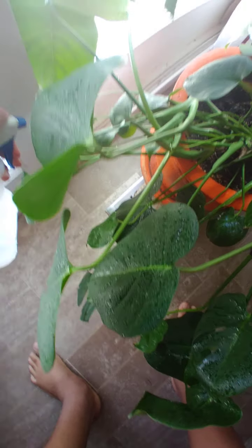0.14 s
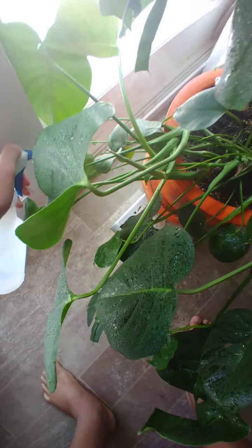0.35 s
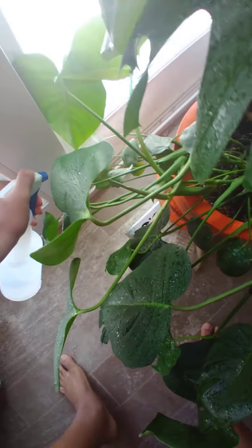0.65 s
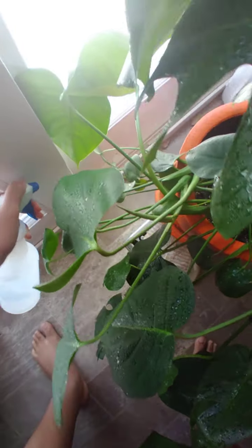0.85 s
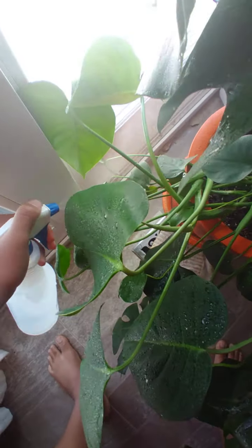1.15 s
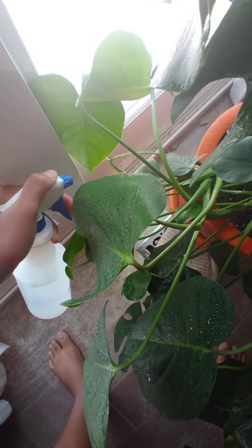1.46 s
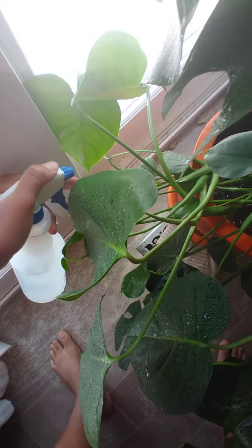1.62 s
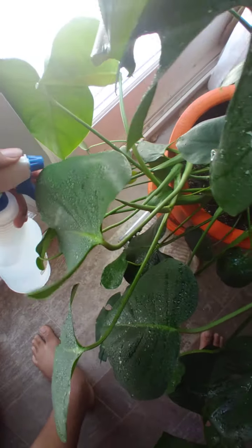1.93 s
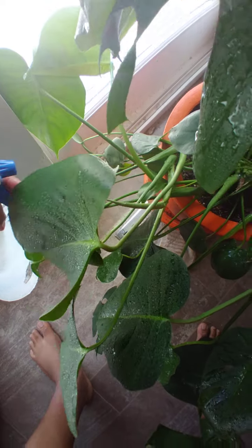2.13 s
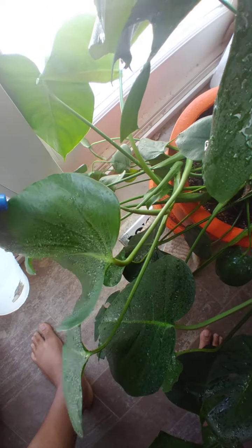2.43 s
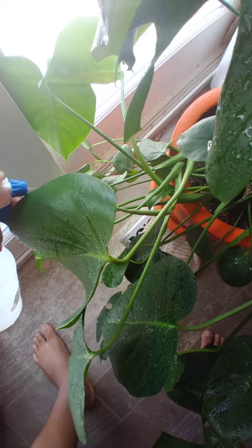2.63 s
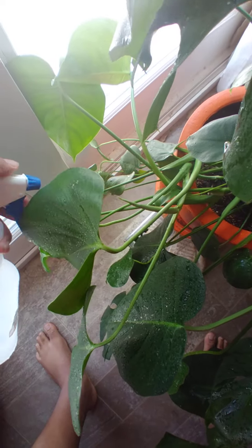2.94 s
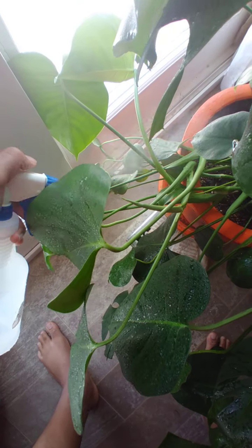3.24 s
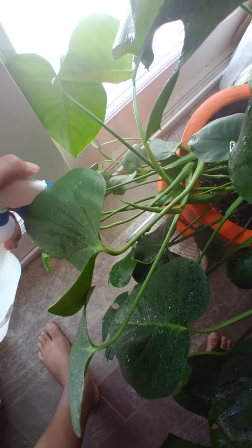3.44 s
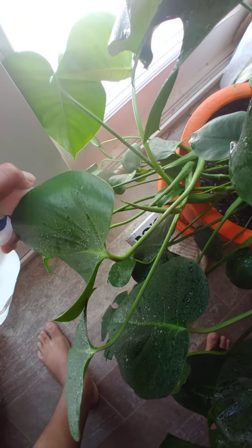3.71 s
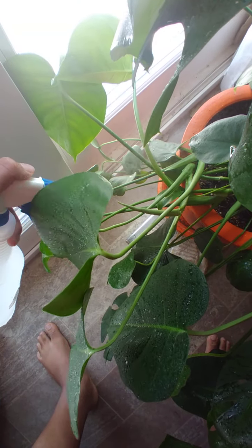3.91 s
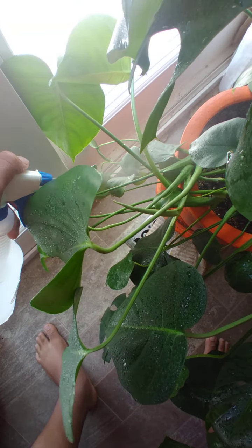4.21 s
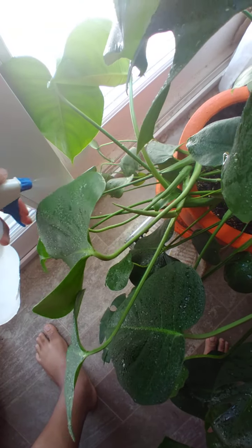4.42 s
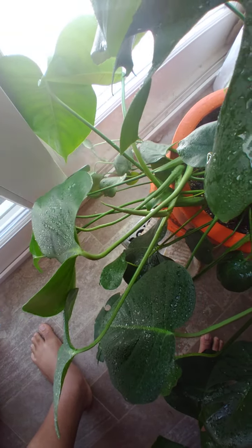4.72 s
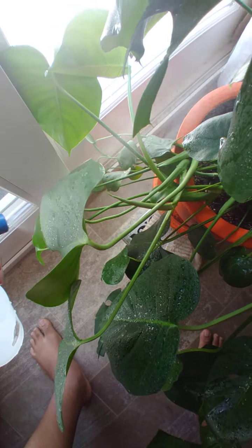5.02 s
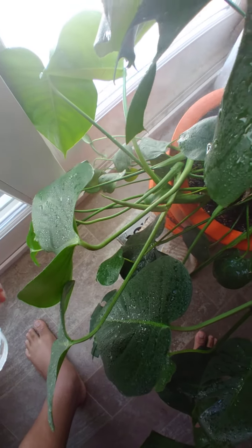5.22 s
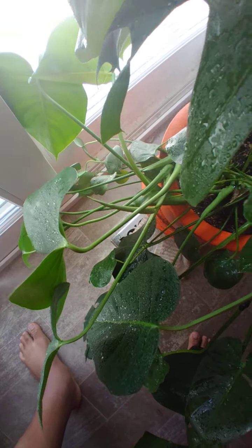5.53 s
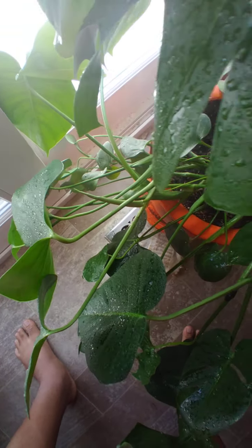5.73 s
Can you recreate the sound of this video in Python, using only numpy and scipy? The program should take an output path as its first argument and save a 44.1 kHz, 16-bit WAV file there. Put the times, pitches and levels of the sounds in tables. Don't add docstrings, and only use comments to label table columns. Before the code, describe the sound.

A hand trigger bottle squirts nine short hissing bursts of mist onto houseplant leaves, with small plastic clicks between, close up in a quiet room.

```python
import sys
import numpy as np
from scipy import signal
from scipy.fft import rfft, irfft, next_fast_len
from scipy.io import wavfile
from scipy.ndimage import uniform_filter1d, map_coordinates

SR = 44100
rng = np.random.default_rng(int(sys.argv[2]) if len(sys.argv) > 2 else 0)


def how_loud(loudness_db):
    steps = np.asarray(loudness_db, float) / 20
    return 10 ** steps


def digitize_waveform(pressure):
    field = np.atleast_2d(pressure).T
    bounded = np.clip(field, -1, 1)
    quanta = np.round(bounded * 32767).astype(np.int16)
    wavfile.write(sys.argv[1], SR, quanta)


N = 258426
STEP = 16

# frequency in Hz, level in dB per Hz.
AIR_SPECTRUM = [(15, -44), (30, -14), (60, -4), (130, -11.5), (240, -9), (450, -26.5), (800, -23.5),
                (1700, -29.5), (3000, -35), (5000, -31), (9100, -25.5), (12000, -35.5), (16000, -41)]
# frequency in Hz, level in dB rms.
MAINS_PARTIALS = [(59.2, -79), (236.9, -90), (296.1, -84), (495.3, -106.5)]
# start in seconds, length in seconds, level in dB, fading in dB.
SHUFFLES = [
    (1.3, 0.23, -77.5, 8.5),
    (1.93, 0.33, -78, 14),
    (4.57, 0.36, -74.5, -1),
    (5.26, .04, -72.5, 5),
]
# frequency in Hz, level in dB per Hz.
SCUFF_SPECTRUM = [(120, -44.5), (220, 3), (400, -2.5), (700, -12), (1500, -31)]

# valve opening, full pressure and finger easing, all in seconds,
# jet level in dB, shutting rate in dB per second.
PULLS = [
    (0.034, 0.114, 0.24, -26.5, 306.5),
    (0.478, 0.561, 0.66, -27, 359),
    (0.937, 1.037, 1.1305, -28, 351.5),
    (3.07, 3.151, 3.293, -27.5, 320),
    (3.532, 3.638, 3.777, -27.5, 383),
    (3.984, 4.09, 4.19, -27.5, 340),
    (4.416, 4.497, 4.617, -27.5, 303),
    (4.866, 4.947, 5.081, -26, 478),
    (5.291, 5.359, 5.488, -28, 240),
]
# time in seconds, left-right difference in dB, squareness to a leaf in dB.
NOZZLE_AIM = [(.13, -6.5, -0.5), (.57, -4.5, -0.8), (1.05, -3.5, 0.3), (3.18, -6.5, 1.4), (3.65, -5, 2.15),
              (4.1, -6, 2.2), (4.5, -5, -1.5), (4.97, -6.5, 0.1), (5.4, -2, 2.5)]
# frequency in Hz, level in dB per Hz.
JET_SPECTRUM = [(1760, -52.5), (3000, -32), (3600, -18), (4230, -17), (5290, -11), (5880, -9), (7350, -7),
                (9010, 1), (9460, 5.5), (11400, -6.5), (15100, -12), (16000, -20.5)]
# frequency in Hz, level in dB per Hz.
LEAF_SPECTRUM = [(240, -75.5), (400, -33), (1090, -15), (1160, -13.5), (1930, -3), (2710, -2.5),
                 (3450, 0.5), (5000, -3), (6500, -16), (11000, -120)]

# start in seconds, length in seconds, level in dB, fading in dB,
# dull share in dB.
PUMP_REFILLS = [
    (.3, 0.12, -60, 36, -9),
    (.765, 0.087, -53.5, 6.5, -2),
    (1.2, 0.1, -61.5, 3, -14),
    (3.35, 0.095, -66.5, 2.5, -1.5),
    (3.82, .13, -58.5, 23.5, 2),
    (4.28, 0.081, -74, 12, -5),
    (4.752, 0.077, -53, 16.5, -17),
    (5.163, 0.068, -52, 35, -14.5),
    (5.6, .2, -66, 24, -13),
]
# start in seconds, length in seconds, level in dB, fading in dB,
# dull share in dB.
LEAF_BRUSHES = [(0.433, .03, -70, -18, -22), (.74, 0.023, -41.5, 13, -3), (1.33, 0.395, -83.5, 1, -4),
                (1.855, 0.072, -73, 9, -13.5), (1.92, .07, -55.5, 3.5, -18.5), (2.03, 0.12, -66, 20, -12),
                (2.145, .05, -73.5, -3.5, -4.5), (2.253, 0.094, -75, 0.5, -3),
                (2.485, 0.082, -70.5, 18, -3), (2.61, 0.085, -74, -1.5, -15.5),
                (2.811, 0.049, -53.5, -4.5, -19), (2.861, 0.062, -52.5, 19, -16.5),
                (2.943, 0.031, -65, 12, -10), (2.999, 0.0099, -53.5, 52, -3.5), (3.042, .02, -83, -9, -20),
                (4.687, 0.027, -59, -4, -18), (5.261, 0.019, -57, 9, -15), (5.818, 0.036, -65.5, -2, -23),
                (5.693, 0.034, -72, 7, -22), (5.75, .02, -77, 9, -11)]
# frequency in Hz, level in dB per Hz.
BRUSH_SPECTRUM = [(2000, -44), (3500, -14), (4800, -14), (6900, -8), (9200, 1.5), (12000, -12.5),
                  (15700, -10.5)]
# frequency in Hz, level in dB per Hz.
DULL_SPECTRUM = [(500, -32), (850, -8), (1300, -12), (2000, -0.5), (3200, -5.5), (5000, -7.5), (7000, -34)]

# time in seconds, peak in dB, knock in dB, t60 in seconds.
STOP_CLICKS = [(.3132, -40, -15, .027), (.7322, -22.5, -19, 0.11), (.8604, -40.5, -38, .011),
               (1.219, -33.5, -18.5, 0.061), (2.474, -38.5, -12, 0.0092), (2.9395, -40.5, -38, 0.019),
               (3.3708, -34, -17, .021), (3.376, -38.5, -14.5, 0.034), (3.4456, -31, -22, 0.024),
               (3.4557, -30.5, -24, 0.024), (3.4694, -35.5, -18, 0.03), (3.9082, -28.5, -22, .034),
               (3.9216, -30, -20, .015), (3.964, -30, -17, .013), (4.3133, -37, -23, 0.014),
               (4.3193, -28, -44, 0.015), (4.336, -40.5, -28, 0.018), (4.696, -38, -34, 0.085),
               (4.7528, -38.5, -36, .022), (4.7694, -33.5, -18, 0.1), (5.1534, -33.5, -16.5, .017),
               (5.2605, -20.5, -22.5, .033), (5.6603, -39.5, -32, .034), (5.8202, -31, -9.5, 0.019)]
# time in seconds, peak in dB, knock in dB.
HOUSING_TAPS = [(.7864, -44, -14), (1.259, -46, -8.5), (1.287, -45, -11.5), (1.8451, -45.5, -10),
                (2.0353, -46, -8.5), (2.2647, -45, -11), (2.2734, -42, -14), (2.297, -64, 11),
                (2.3299, -56.5, 0), (2.3954, -69, -8.5), (2.4961, -55, -5), (2.986, -49, -4.5),
                (3.413, -43, -9), (3.4222, -45, -16), (3.8273, -45, -15), (3.864, -45, -13),
                (3.8959, -43.5, -21), (4.8107, -43.5, -19), (5.643, -44.5, -13), (5.7587, -68, 10.5)]
# time in seconds, peak in dB.
FALLING_DROPS = [(.3474, -49), (0.363, -50), (0.376, -46.5), (.388, -62), (0.4258, -44), (0.4502, -41),
                 (2.083, -59), (2.149, -61), (2.6002, -49.5), (2.6654, -59), (2.9313, -47), (2.966, -51),
                 (2.9978, -41.5), (3.486, -43), (4.7363, -47), (4.786, -43), (5.2103, -50.5),
                 (5.5724, -37.5), (5.6792, -47), (5.715, -55), (5.728, -54.5)]
# frequency in Hz, width in Hz, level in dB.
HOUSING_MODES = [(1794, 310, 2.5), (3155, 1400, -1), (4540, 690, -5)]
# frequency in Hz, level in dB per Hz.
SNAP_SPECTRUM = [(2500, -54), (4500, -11.5), (6500, -6.5), (9300, 7.5), (12000, -4), (15500, -17.5)]

# time in seconds, peak in dB, pitch in Hz, t60 in seconds,
# thump in dB.
WALL_KNOCKS = [
    (.612, -44, 900, 0.094, -20),
    (.633, -43.5, 820, 0.071, 5),
    (0.655, -52.5, 780, 0.09, 18),
    (.679, -40.5, 938, 0.038, -19),
    (1.686, -48, 580, 0.013, -18.5),
    (2.627, -63.5, 546, 0.16, -27),
    (3.405, -43, 805, 0.019, -12),
    (3.501, -48.5, 1320, 0.02, -10.5),
]
# time in seconds, level in dB.
WHEEZE = [
    (3.7, -104.5),
    (3.77, -71),
    (4.3, -75),
    (4.4, -84.5),
    (4.46, -100),
]

# start in seconds, length in seconds, level in dB, fading in dB,
# higher share in dB.
AIR_PUFFS = [(.6, 0.036, -75.5, -12, 8), (0.658, 0.12, -68, 7.5, 10), (0.78, 0.057, -67.5, 10, 10.5),
             (1.474, 0.025, -52, 6, -10.5), (1.505, 0.17, -61.5, 0, -11.5), (4.788, 0.084, -76, -16, -7),
             (4.892, 0.12, -54.5, 8.5, -6), (5.107, 0.19, -77.5, -10, -5), (5.31, 0.25, -56.5, 11, -11.5),
             (5.512, 0.17, -58, 13, -7.5), (5.707, 0.17, -64.5, 6.5, -7.5)]
# frequency in Hz, level in dB per Hz.
GUST_SPECTRUM = [(20, -37), (45, 5), (70, 7), (120, 2), (170, -13), (300, -37.5), (600, -120)]
# frequency in Hz, level in dB per Hz.
FLAP_SPECTRUM = [(60, -68.5), (90, -24.5), (140, -24.5), (210, -6.5), (320, -15.5), (600, -33),
                 (1200, -32.5), (2500, -120)]

# frequency in Hz, share heard alike by both.
SHARED_PART = [(60, .95), (300, .8), (700, .45), (2000, .35), (10000, .2), (16000, .15)]
# frequency in Hz, lead of the left port in radians.
PORT_PHASE = [(0, 0), (1700, -.8), (2700, -4), (5500, -13), (9500, -27), (16000, -40)]
# frequency in Hz, t60 in seconds.
ROOM_DECAY = [(300, 0.15), (3000, 0.036), (12000, 0.062)]
# frequency in Hz, level in dB.
BAND_LIMIT = [(15700, 0), (15900, -41), (16500, -43.5), (16700, -90)]


def unit(x):
    return x / np.sqrt(np.mean(x ** 2) + 1e-20)


def along(points, hz):
    f, v = np.transpose(points)
    return np.interp(np.log(hz + 1), np.log(f + 1), v)


def wobble(rate):
    knots = rng.standard_normal(size=2400)
    return map_coordinates(knots, [np.arange(N) * rate / SR], mode="wrap")


def filtered(x, response):
    m = next_fast_len(N + SR // 2)
    return irfft(rfft(x, m) * response(np.fft.rfftfreq(m, 1 / SR)), m)[..., :N]


def ports(noises, gain):
    def share(hz):
        return np.clip(along(SHARED_PART, hz), 0, 1)

    def delay(hz):
        return np.exp(np.outer([.5j, -.5j], np.interp(hz, *np.transpose(PORT_PHASE))))

    shared = filtered(noises[0], lambda hz: gain(hz) * np.sqrt(share(hz)) * delay(hz))
    return shared + filtered(noises[1:], lambda hz: gain(hz) * np.sqrt(1 - share(hz)))


def hiss(spectrum, grain_db):
    clumps = how_loud(grain_db * wobble(350) + grain_db * wobble(60))
    spray = rng.standard_normal((3, N)) * clumps
    return unit(ports(spray, lambda hz: how_loud(along(spectrum, hz))))


def sides(pan_db):
    return how_loud(np.array([pan_db / 2, -pan_db / 2]))


def strokes(rows, rise, fall):
    s, length, db, fading_db = np.array(rows).T[:4, :, None]
    t = np.arange(0, N, STEP) / SR - s
    fading = fading_db * np.clip(t / length, 0, 1)
    return db - fading + rise * np.minimum(t, 0) - fall * np.maximum(t - length, 0)


def loudest(levels_db, *columns):
    def smooth(v, size):
        return uniform_filter1d(np.repeat(v, STEP)[:N], size)

    who = np.argmax(levels_db, axis=0)
    gain = smooth(how_loud(levels_db.max(axis=0)), size=129)
    return [gain] + [smooth(np.array(c, float)[who], size=1500) for c in columns]


def patchy(x, depth_db):
    z = signal.stft(x, nperseg=512)[2]
    field = uniform_filter1d(rng.standard_normal(z.shape), size=4, axis=1)
    field = uniform_filter1d(field, size=18, axis=2)
    return signal.istft(z * how_loud(depth_db * unit(field)), nperseg=512)[1][:, :N]


def hush():
    t = np.arange(N) / SR
    hum = np.zeros(N)
    for hz, db in MAINS_PARTIALS:
        level_db, phase = 2.5 * wobble(14), .8 * wobble(12)
        hum += how_loud(db + level_db) * np.sin(2 * np.pi * hz * t + phase)
    scraping, air = how_loud(3 * wobble(34)), how_loud(1.2 * wobble(9))
    steps = loudest(strokes(SHUFFLES, rise=300.5, fall=201))[0]
    floor = steps * scraping * hiss(SCUFF_SPECTRUM, grain_db=0.0)
    return hum + floor + how_loud(-80.5) * air * hiss(AIR_SPECTRUM, grain_db=-4.0)


def mist():
    t = np.arange(N) / SR
    build_db, sag_db = 10, 7.5
    open_rate = 951.5
    levels_db = []
    for opens, full, eases, db, shut_rate in PULLS:
        times = [opens - .1, opens, full, eases, eases + 0.31]
        pressure_db = [-build_db - 0.11 * open_rate, -build_db, 0, -sag_db, -sag_db - 0.29 * shut_rate]
        levels_db.append(db + np.interp(t[::STEP], times, pressure_db))
    _, full_s, _, top_db, _ = np.transpose(PULLS)
    jet, full_s, top_db = loudest(np.array(levels_db), full_s, top_db)

    aim_s, side_db, square_db = np.transpose(NOZZLE_AIM)
    weaker_db = top_db - 20 * np.log10(jet + 1e-9)
    wet_db = -20 + np.interp(t, aim_s, square_db) + np.minimum(0.69 * weaker_db, 1.5)
    pan_db = np.interp(t, aim_s, side_db) + 11.5 * (t - full_s)
    spray = how_loud(3.0) * sides(pan_db) * hiss(JET_SPECTRUM, grain_db=-0.34)
    spray = spray + how_loud(wet_db + 5.0) * hiss(LEAF_SPECTRUM, grain_db=0.75)
    return jet * patchy(spray, depth_db=2.2)


def rustle():
    rows = PUMP_REFILLS + LEAF_BRUSHES
    bright, dull_db = loudest(strokes(rows, rise=1500, fall=698), [row[-1] for row in rows])
    fine = how_loud(1.5) * sides(-4.5)[:, None] * hiss(BRUSH_SPECTRUM, grain_db=.8)
    dull = how_loud(dull_db + 1) * hiss(DULL_SPECTRUM, grain_db=3.0)
    return bright * how_loud(-0.6) * (fine + dull)


def ticks():
    def shell(f):
        total = 0
        for k, (centre, width, db) in enumerate(HOUSING_MODES):
            mode = 1j * f * width / (centre * centre - f * f + 1j * f * width)
            total = total + (-1) ** k * how_loud(db) * mode
        return total

    out, t = np.zeros((2, N + SR)), np.arange(SR // 10) / SR
    housing = np.tile(ports(rng.standard_normal((3, N)), lambda f: shell(f) ** 2), 2)
    crackle = np.tile(hiss(SNAP_SPECTRUM, grain_db=1.5), 2)
    rows = list(STOP_CLICKS)
    rows += [(*row, 0.04) for row in HOUSING_TAPS]
    rows += [(*row, -29, 0.05) for row in FALLING_DROPS]
    for s, db, knock_db, t60 in rows:
        at = slice(round(s * SR), round(s * SR) + len(t))
        decay = how_loud(-60 * t / 0.013) + .6 * how_loud(-60 * t / max(t60, .005))
        snap = decay * (1 - np.exp(-t / 0.00017)) * crackle[:, at]
        knock = how_loud(-60 * t / 0.022) * (1 - np.exp(-t / 0.00028)) * housing[:, at]
        out[:, at] += how_loud(db + 0.5) * sides(-3.0)[:, None] * snap / np.abs(snap).max()
        out[:, at] += how_loud(db + knock_db + 1.0) * knock / np.abs(knock).max()
    return out[:, :N]


def bottle():
    wall, t = np.zeros(N + SR), np.arange(SR // 5) / SR
    f = np.fft.rfftfreq(len(t), 1 / SR)

    def band(hz, q):
        resonance = 1j * f * hz / q / (hz * hz - f * f + 1j * f * hz / q)
        return unit(irfft(rfft(rng.standard_normal(len(t))) * resonance ** 2, len(t)))

    for s, db, hz, t60, thump_db in WALL_KNOCKS:
        ring = band(hz, q=1.8) + .5 * how_loud(-60 * t / 0.049) * band(1400, q=0.64)
        ring = ring * how_loud(-60 * t / max(t60, .01))
        ring = ring + how_loud(thump_db - 60 * t / 0.075) * band(179, q=2.76)
        ring = ring * (1 - np.exp(-t / 0.00033))
        wall[round(s * SR):][:len(t)] += how_loud(db + max(thump_db, 0)) * ring / np.abs(ring).max()

    def reed_bands(f):
        return 1 / (1 + ((f - 1490) / 85) ** 2) + 0.24 / (1 + ((f - 1700) / 80) ** 2)

    reed = unit(filtered(rng.standard_normal(N), reed_bands))
    flutter = how_loud(1.5 * wobble(30))
    wheeze = how_loud(np.interp(np.arange(N) / SR, *np.transpose(WHEEZE)))
    return wall[:N] + wheeze * flutter * reed


def draught():
    gust, flap_db = loudest(strokes(AIR_PUFFS, rise=600, fall=298), [row[-1] for row in AIR_PUFFS])
    pan_db = 13.5 - 0.97 * flap_db
    lumps = how_loud(4.5 * wobble(42))
    low = filtered(rng.standard_normal((2, N)), lambda hz: how_loud(along(GUST_SPECTRUM, hz)))
    low = unit(lumps * low)
    flapping = how_loud(3.8 * wobble(30))
    high = ports(rng.standard_normal((3, N)), lambda hz: how_loud(along(FLAP_SPECTRUM, hz)))
    high = unit(flapping * high)
    return gust * how_loud(-1.5) * (sides(pan_db) * low + how_loud(flap_db) * sides(0.14 * pan_db) * high)


def room(x):
    hz, _, z = signal.stft(rng.standard_normal((2, SR // 3)), SR, nperseg=256)
    _, _, t = hz, z, np.arange(z.shape[-1]) * 128 / SR
    tail = signal.istft(z * how_loud(-60 * t / along(ROOM_DECAY, hz)[:, None]), SR, nperseg=256)[1]
    late = np.pad(x, ((0, 0), (200, 0)))
    return signal.fftconvolve(late, tail / np.linalg.norm(tail[0]), axes=1)[:, :N]


def scene():
    background = hush()
    near = mist() + ticks() + bottle()
    reverberation = how_loud(-15) * room(near)
    return near + reverberation + rustle() + draught() + background


def band_limit(x):
    return signal.sosfilt(signal.butter(12, 16670, fs=SR, output="sos"), x)


def record(dry):
    mix = filtered(dry, lambda hz: how_loud(along(BAND_LIMIT, hz)))
    return band_limit(mix)


dry = scene()
out = record(dry)
digitize_waveform(out)
```